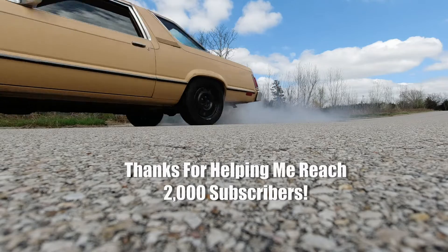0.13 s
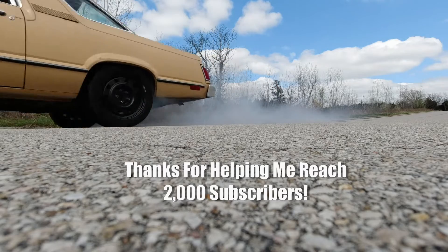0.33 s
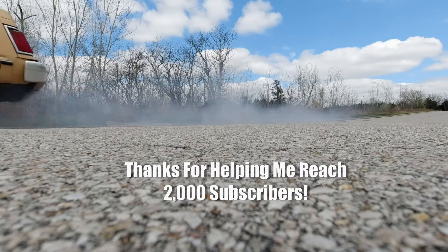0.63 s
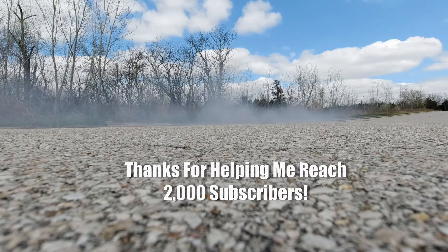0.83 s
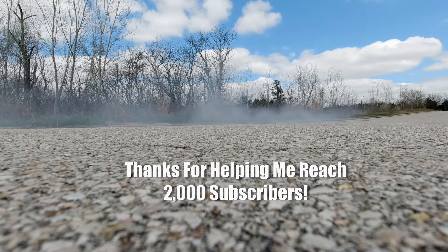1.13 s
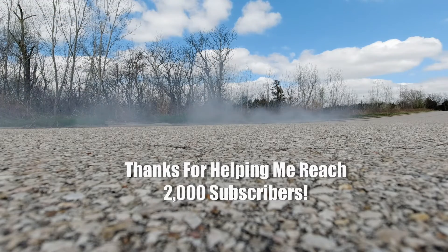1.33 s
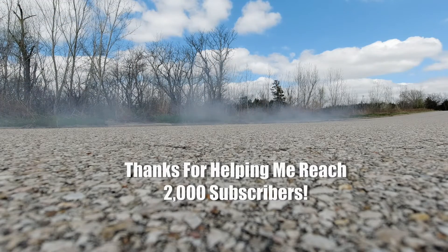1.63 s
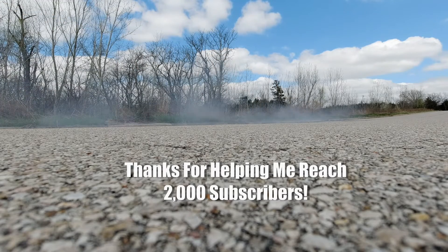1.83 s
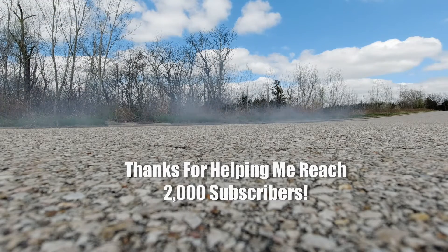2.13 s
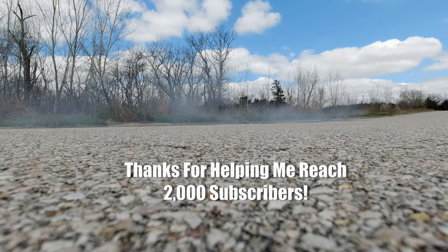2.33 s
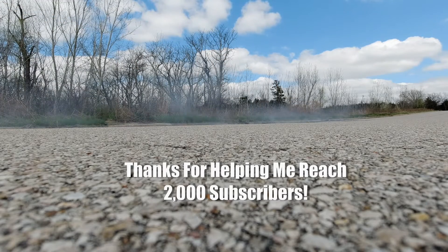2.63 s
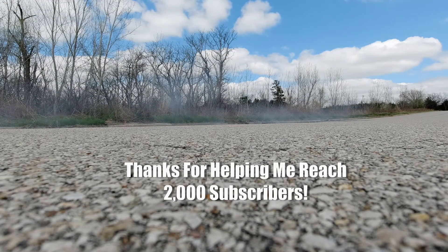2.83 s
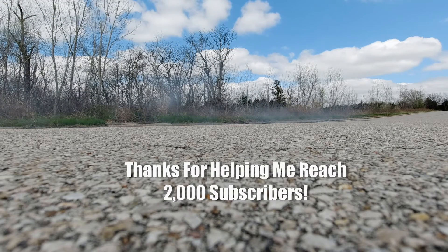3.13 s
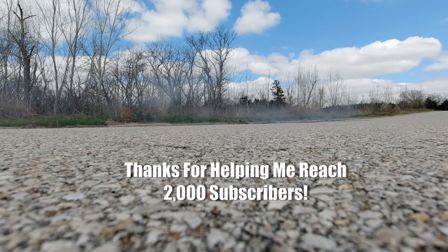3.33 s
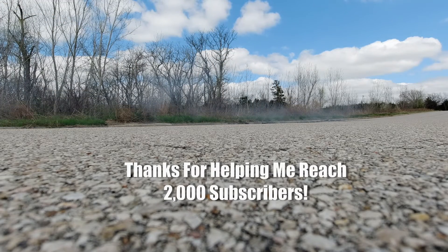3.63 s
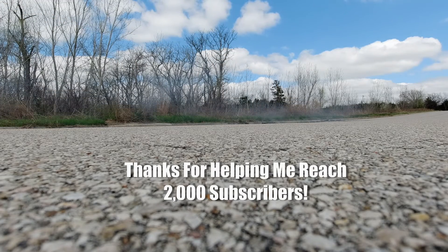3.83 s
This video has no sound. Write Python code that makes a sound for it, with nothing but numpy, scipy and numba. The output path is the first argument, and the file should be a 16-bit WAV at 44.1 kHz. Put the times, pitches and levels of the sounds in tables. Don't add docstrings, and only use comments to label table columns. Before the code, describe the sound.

A car's squealing, scrubbing tyres and droning engine pass close, then fade to low exhaust burble

```python
import sys
import numpy as np
from scipy import signal
from scipy.fft import rfft, irfft
from scipy.io import wavfile
from scipy.ndimage import uniform_filter1d, map_coordinates
from numba import njit

SR = 44100
rng = np.random.default_rng(int(sys.argv[2]) if len(sys.argv) > 2 else 0)


def natural_amplitude(level_db):
    exponent = np.asarray(level_db, float) / 20
    return 10 ** exponent


def wav_out(sig):
    wavfile.write(sys.argv[1], SR, np.round(np.clip(np.atleast_2d(sig).T, -1, 1) * 32767).astype(np.int16))


N = 176400

# t/s, level/dB
ENGINE_LEVEL = [(0, -24), (.4, -24), (.6, -24), (.8, -29), (.95, -31.5), (1.1, -36.5), (1.25, -44.5),
                (1.42, -49), (1.55, -53.5), (1.7, -85)]
# t/s, speed/turns per s
CRANK_SPEED = [(0, 63.5), (.2, 63.3), (.4, 62), (.6, 60), (.8, 57.3), (.9, 54.6), (1.0, 51.6), (1.1, 48),
               (1.2, 44), (1.3, 39.5), (1.4, 37), (1.7, 34)]
# multiple of crank speed, level/dB
DRONE_TONES = [(1, -18), (1.34, -25), (2, -20), (2.39, 0), (2.64, -14), (3, -3), (3.56, -11), (4, -15),
               (4.41, -19), (5, -15), (5.5, -21), (6, -16), (7.18, -13), (8, -10.5), (8.4, -17),
               (10.6, -17)]
# t/s, near squeal level/dB, far squeal level/dB, scrub level/dB
TYRE_SLIP = [(0, -23.5, -34.5, -23), (.3, -24, -38, -23.5), (.4, -27, -36.5, -24), (.56, -25, -36.5, -27),
             (.62, -26.5, -32.5, -30), (.8, -21.5, -23, -28), (.9, -25.5, -30.5, -27.5),
             (1.0, -31.5, -33, -31.5), (1.12, -42, -46, -39.5), (1.17, -50, -43, -48.5),
             (1.21, -83, -72, -64), (1.5, -99, -99, -99)]
# t/s, length/s, f/Hz, peak level/dB
SHRIEKS = [(0.063, 0.031, 1592, -19), (.135, 0.039, 1500, -16.5), (0.242, 0.037, 1559, -14.5),
           (0.28, .035, 1346, -18), (.305, 0.037, 1513, -14.5), (0.363, 0.017, 1550, -18.5),
           (0.477, .03, 1750, -18.5), (0.569, 0.04, 1128, -20.5), (0.635, .035, 706.5, -20),
           (0.725, 0.026, 683, -21.5), (0.781, 0.037, 1584, -23), (0.615, .09, 424.4, -26),
           (0.931, 0.037, 897, -27)]
# f/Hz, level per Hz/dB
SCRUB_COLOUR = [(25, -17), (130, -11), (450, -8), (1100, -2), (2150, -7), (2500, -11.5), (3300, -15),
                (5000, -32.5), (15000, -64)]
# t/s, coarse level/dB, fine level/dB
GRIT_LEVEL = [(0, -31, -48), (.3, -34, -46), (.5, -33, -52.5), (.58, -37.5, -52), (.7, -41.5, -56),
              (.85, -51.5, -58), (1.0, -53.5, -63.5), (1.1, -50.5, -67.5), (1.2, -59.5, -75),
              (1.26, -54, -72), (1.35, -60.5, -78), (1.45, -55.5, -72), (1.6, -63, -79.5), (1.79, -75, -86),
              (1.83, -71.5, -88), (1.95, -75, -85.5), (2.3, -80, -90), (2.85, -81, -100),
              (2.97, -86.5, -93), (3.1, -89, -102), (3.28, -85.5, -102), (3.36, -89.5, -92.5),
              (3.45, -89, -103), (3.72, -93.5, -103), (3.79, -88.5, -93), (3.86, -90, -104), (4, -89, -104)]
# f/Hz, level per Hz/dB
GRIT_COLOUR = [(900, -19.5), (2200, -2), (3300, 0.5), (5200, -7.5), (6300, -16), (7300, -26.5),
               (15500, -58.5)]
# f/Hz, level per Hz/dB
SMOKE_COLOUR = [(3000, -29), (5000, -5), (7200, -8), (9000, -5.5), (12000, -7.5), (15500, -12.5)]
# t/s, level/dB
DUST_LEVEL = [(0, -75), (.38, -71), (.5, -62), (.8, -67), (1.05, -72), (1.17, -95), (4, -120)]
# f/Hz, level per Hz/dB
DUST_COLOUR = [(9000, -29.5), (12000, -3.5), (15500, -0.5)]
# t/s, road roar level/dB, exhaust burble level/dB, delay at right port/samples
LEAVING = [(0, -71, -60, 0.88), (.3, -38, -66, 1.6), (.6, -28, -45, 4.4), (.9, -30, -71, 7.33),
           (1.2, -47, -36, 7.6), (1.5, -49, -51.5, 6.7), (1.85, -49.5, -45, 7.5), (1.95, -52, -57, 6.9),
           (2.15, -53, -51.5, 6.5), (2.6, -57, -55.5, 6.1), (3.3, -60.5, -55.5, 5.6), (4, -65.5, -56, 6.1)]
# f/Hz, level per Hz/dB
ROAR_COLOUR = [(24, -17), (120, -6), (250, -7.5), (480, -13.5), (1200, -14.5), (2400, -29), (4500, -53.5),
               (15000, -90)]
# f/Hz, level per Hz/dB
SCATTER_COLOUR = [(30, -14.5), (250, -12), (1200, -8), (2400, -22), (4500, -29), (15000, -71.5)]
# f/Hz, width/Hz, level/dB
BURBLE_PIPE = [(44.7, 14, -5), (85, 19, -2), (121, 31, -1.5), (209.2, 36, -5.5), (384, 160, -17.5)]
# f/Hz, width/Hz, start t/s, end t/s, level at start/dB, fade/dB per s
BOOMS = [
    (43.6, 13, 1.26, 1.985, -50.5, -0.5),
    (77.5, 11, 1.5, 1.9, -47.5, 4),
    (124.7, 16.6, 1.6, 4.2, -59.5, 0.3),
    (205.8, 7.5, 1.1, 4.2, -59, 7.5),
    (371, 14, 1.73, 4.2, -65.5, 7),
    (52.4, 22, 1.32, 1.6, -43.5, -5),
    (104, 9, 3.62, 3.84, -52.5, -0.5),
]
# t/s, length/s, f/Hz, peak level/dB
METAL_RINGS = [
    (1.306, .012, 6060, -49.5),
    (1.315, .014, 6010, -50),
    (1.33, .01, 5960, -64),
    (1.306, .05, 1031, -46),
    (3.01, .06, 400, -53.5),
    (3.381, 0.045, 390, -53),
    (3.918, 0.068, 220, -55.5),
]
# t/s, peak level/dB
POPS = [(1.422, -27.5), (1.512, -30.5), (1.56, -30), (1.752, -44), (1.806, -32.5), (1.833, -31),
        (1.969, -36), (2.059, -43), (2.145, -43), (2.33, -40), (2.404, -46)]
# f/Hz, width/Hz, level/dB
POP_PIPE = [(124.5, 144, 4), (204, 45, 5), (367, 45, -2.5), (1500, 1450, -2.5)]

NEAR_SQUEAL_HZ, FAR_SQUEAL_HZ, SQUEAL_SPREAD = 1565.6, 700.3, .07
SETTLE_S, GRIP_S, SETTLED_SPREAD = .65, .92, .63
GRIT_SHARED, SMOKE_SHARED = .76, .15
BURBLE_HZ, BURBLE_SCATTER_DB = 62.84, 3
WHINE_HZ, WHINE_FALL_HZ_S, WHINE_DB, WHINE_FADE_DB_S = 276, 14, -63, 2.5
DIP_HZ, DIP_WIDTH_HZ = 2900., 550.
DIP_FROM_S, DIP_TO_S, DIP_EDGE_S = .94, 1.68, .12
PORT_HZ, PORT_WIDTH_HZ, PORT_DB = 9630., 2800., 6.5


def level(x, db):
    return x * natural_amplitude(db) / np.sqrt(np.mean(x ** 2))


def track(table, col):
    table = np.array(table)
    return np.interp(np.arange(N) / SR, table[:, 0], table[:, col])


@njit
def svf(x, hz, width):
    y, band, low = np.empty(len(x)), 0., 0.
    g, k = np.tan(np.pi * hz / SR), width / hz
    for i in range(len(x)):
        v = (band + g * (x[i] - low)) / (1 + g * (g + k))
        band, low, y[i] = 2 * v - band, low + 2 * g * v, k * v
    return y


def walk(rate):
    hold = int(SR / rate)
    steps = np.repeat(rng.standard_normal(N // hold + 1), hold)
    return 1.39 * uniform_filter1d(uniform_filter1d(steps, hold), hold)[:N]


def rush(colour, flicker_db, shared_db):
    colour = np.array(colour)
    hz = np.maximum(np.arange(N // 2 + 1) * SR / N, 1)
    colour_db = np.interp(np.log(hz), np.log(colour[:, 0]), colour[:, 1])
    spectrum = rfft(rng.standard_normal(N)) * natural_amplitude(colour_db)
    place = 1.5 * np.log2(hz / 25)
    swell = walk(9)
    out = np.zeros(N)
    for k in range(15):
        if 25 * 2 ** (k / 1.5) > colour[0, 0] / 2:
            band = irfft(spectrum * np.clip(1 - abs(place - k), 0, 1), N)
            out += band * natural_amplitude(flicker_db * walk(12) + shared_db * swell)
    return level(out, 0)


def ring(x, pipe):
    return sum((-1) ** k * natural_amplitude(db) * svf(x, 1. * hz, 1. * width) for k, (hz, width, db) in enumerate(pipe))


def tone(hz, wobble_db):
    turns = np.cumsum(hz) / SR + rng.random()
    return np.sqrt(2) * natural_amplitude(wobble_db * walk(7)) * np.sin(2 * np.pi * turns)


def burst(length_s, hz, glide):
    u = np.linspace(0, 1, int(length_s * SR))
    turns = hz * length_s * (u + glide * (u * u - u))
    return np.sin(np.pi * u) ** 2 * np.sin(2 * np.pi * turns)


def add_burst(out, s, length_s, hz, db):
    b = burst(length_s, hz, -.016) * natural_amplitude(db)
    i = int((s - length_s / 2) * SR)
    out[i:i + len(b)] += b


def drone():
    crank = track(CRANK_SPEED, 1)
    loss_db = -(1 - crank / crank[0])
    out = np.zeros(N)
    for multiple, db in DRONE_TONES:
        pitch = multiple * crank * (1 + .002 * walk(10))
        wobble_db = 3 * min(.2 - db / 12, 1)
        out += natural_amplitude(db - multiple * loss_db) * tone(pitch, wobble_db)
    return level(out, 0) * natural_amplitude(track(ENGINE_LEVEL, 1))


def squeal(hz, count):
    out = np.zeros(N + SR)
    draws = zip(rng.random((count, 3)), rng.standard_normal((count, 2)))
    for (when, size, length), (detune, glide) in draws:
        s = 1.25 * when
        spread = SQUEAL_SPREAD * (SETTLED_SPREAD if SETTLE_S < s < GRIP_S else 1)
        b = burst(.026 * (.5 + length), hz * (1 + spread * detune), .029 * glide)
        i = int(s * SR)
        out[i:i + len(b)] += b * natural_amplitude(-1.5 * np.log(size))
    return out[:N] / np.sqrt(np.mean(out[:SR] ** 2))


def tyres():
    out = squeal(NEAR_SQUEAL_HZ, count=520) * natural_amplitude(track(TYRE_SLIP, 1))
    out += squeal(FAR_SQUEAL_HZ, count=260) * natural_amplitude(track(TYRE_SLIP, 2))
    out += rush(SCRUB_COLOUR, .92, .52) * natural_amplitude(track(TYRE_SLIP, 3))
    for row in SHRIEKS:
        add_burst(out, *row)
    return out


def coarse_grit():
    return rush(GRIT_COLOUR, .62, .96) * natural_amplitude(track(GRIT_LEVEL, 1))


def fine_smoke(gust_db):
    return rush(SMOKE_COLOUR, 1.2, .3) * natural_amplitude(track(GRIT_LEVEL, 2) + gust_db)


def dust():
    return rush(DUST_COLOUR, 1.6, 1.1) * natural_amplitude(track(DUST_LEVEL, 1))


def scattered_sound(loudness):
    return natural_amplitude(-17) * loudness * rush(SCATTER_COLOUR, 1.0, .5)


def road_roar():
    return rush(ROAR_COLOUR, 2.8, 1.0) * natural_amplitude(track(LEAVING, 1))


def exhaust_burble():
    draws = rng.standard_normal((400, 2))
    at = (np.cumsum(np.exp(.17 * draws[:, 0])) / BURBLE_HZ * SR).astype(int)
    inside = at < N
    pulses = np.zeros(N)
    pulses[at[inside]] = natural_amplitude(BURBLE_SCATTER_DB * draws[inside, 1])
    puffs = signal.fftconvolve(pulses - pulses.mean(), np.hanning(90))[:N]
    return level(ring(puffs, BURBLE_PIPE), 0) * natural_amplitude(track(LEAVING, 2))


def booms():
    t = np.arange(N) / SR
    out = np.zeros(N)
    for hz, width, start, end, db, fade in BOOMS:
        boom = svf(svf(rng.standard_normal(N), 1. * hz, 1. * width), 1. * hz, 1. * width)
        gate = np.clip(np.minimum(t - start, end - t) / .042, 0, 1)
        out += level(boom, db) * natural_amplitude(-fade * (t - start)) * gate
    return out


def gear_whine():
    late = np.arange(N) / SR - 1.5
    pitch = WHINE_HZ - WHINE_FALL_HZ_S * late + 2.5 * walk(6)
    fade_in = np.clip(late / .26 + 1, 0, 1)
    return tone(pitch, 2.5) * natural_amplitude(WHINE_DB - WHINE_FADE_DB_S * late) * fade_in


def loose_metal():
    out = np.zeros(N)
    for row in METAL_RINGS:
        add_burst(out, *row)
    return out


def exhaust_pops():
    n = np.arange(900)
    puff = np.exp(-n / 260) * (1 - np.exp(-n / 40)) * (1 + .91 * rng.standard_normal(900))
    pop = ring(np.r_[puff, np.zeros(2000)], POP_PIPE)
    pop = svf(svf(pop, 510., 2700.), 500., 2900.)
    hits = np.zeros(N)
    for s, db in POPS:
        hits[int(s * SR)] = natural_amplitude(db)
    return signal.fftconvolve(hits, .58 * pop / abs(pop).max())[:N]


def road_dip(x):
    t = np.arange(N) / SR
    amount = np.clip(np.minimum(t - DIP_FROM_S, DIP_TO_S - t) / DIP_EDGE_S, 0, 1)
    return amount * svf(x, DIP_HZ, DIP_WIDTH_HZ)


def scene():
    gust_db = 1.14 * (walk(14) + walk(37)) / 2
    shared_smoke = np.sqrt(SMOKE_SHARED) * fine_smoke(gust_db)
    car = drone() + tyres() + np.sqrt(GRIT_SHARED) * coarse_grit()
    car += road_roar() + exhaust_burble() + booms() + gear_whine() + loose_metal() + exhaust_pops()
    delayed = map_coordinates(car, [np.arange(N) - track(LEAVING, 3)], mode="mirror")
    loudness = np.sqrt(uniform_filter1d(car ** 2, size=8000) + 1e-12)
    ports = []
    for heard, treble_db in ((car, 0), (delayed, .5)):
        x = heard + np.sqrt(1 - GRIT_SHARED) * coarse_grit()
        x = x + np.sqrt(1 - SMOKE_SHARED) * fine_smoke(gust_db) + shared_smoke
        x = x + dust() + scattered_sound(loudness)
        ports.append(x - road_dip(x) + (natural_amplitude(treble_db) - 1) * svf(x, 5000., 9000.))
    return np.array(ports)


def top_cut(x):
    return signal.sosfilt(signal.butter(12, 15750, fs=SR, output="sos"), x)


def record(dry):
    mix = np.array([x + natural_amplitude(PORT_DB) * svf(x, PORT_HZ, PORT_WIDTH_HZ) for x in dry])
    return top_cut(mix)


dry = scene()
out = record(dry)
wav_out(out)
```